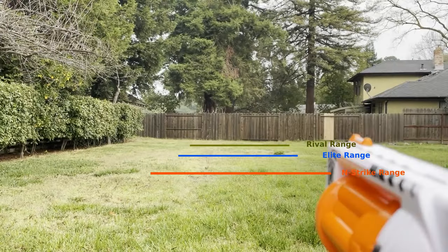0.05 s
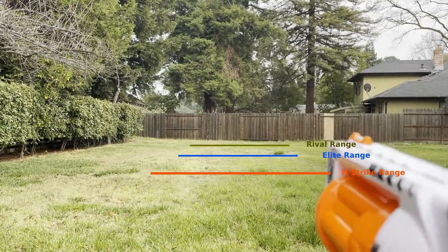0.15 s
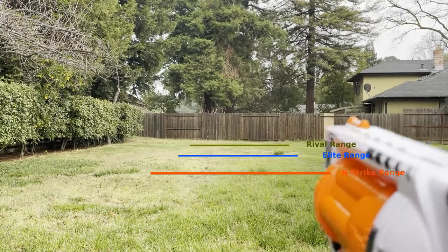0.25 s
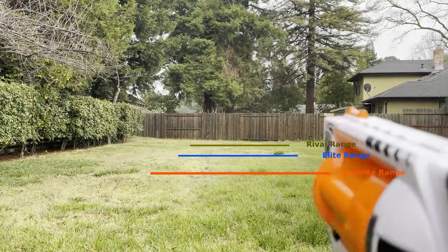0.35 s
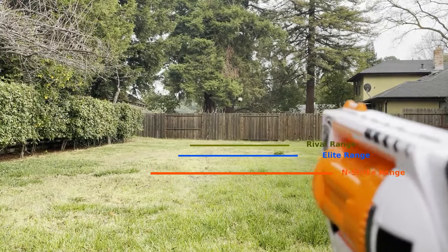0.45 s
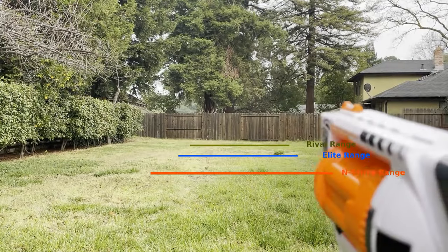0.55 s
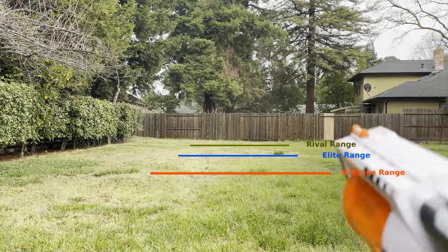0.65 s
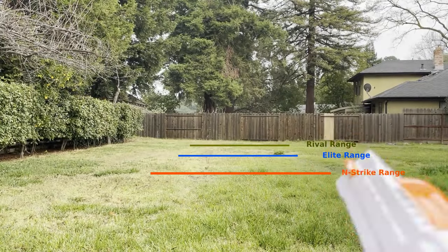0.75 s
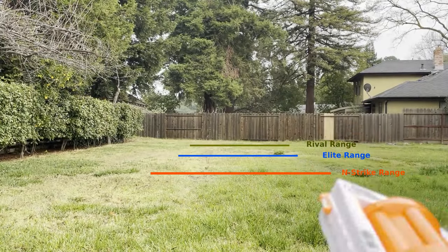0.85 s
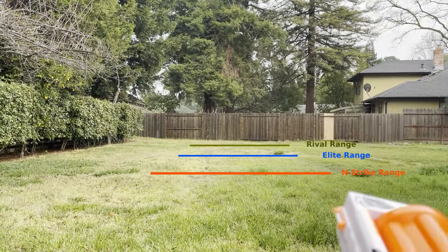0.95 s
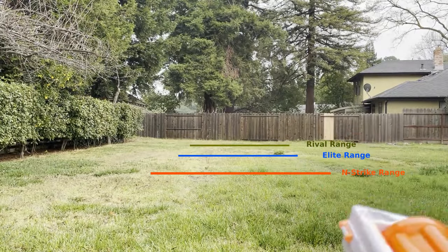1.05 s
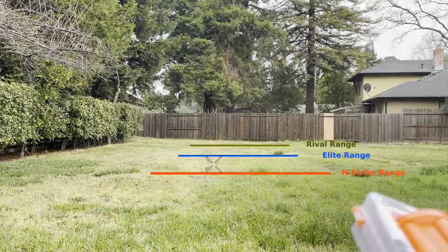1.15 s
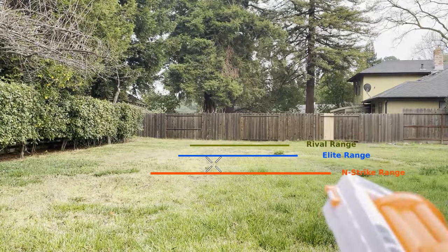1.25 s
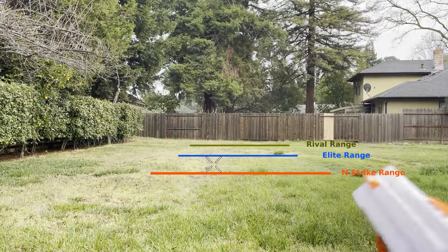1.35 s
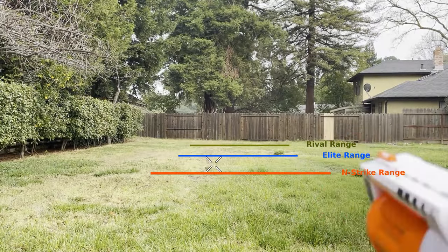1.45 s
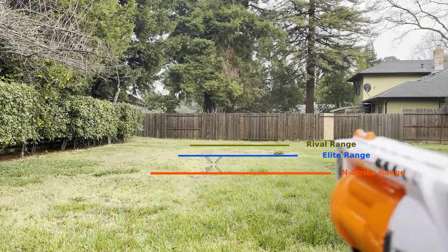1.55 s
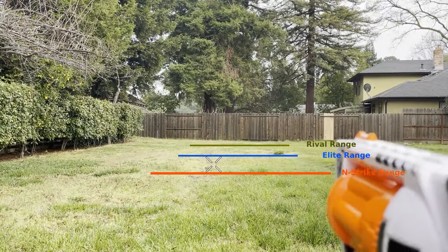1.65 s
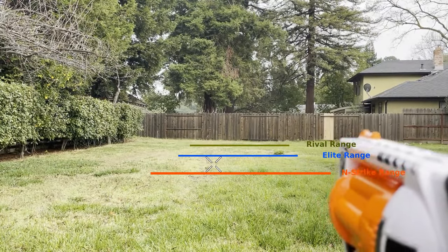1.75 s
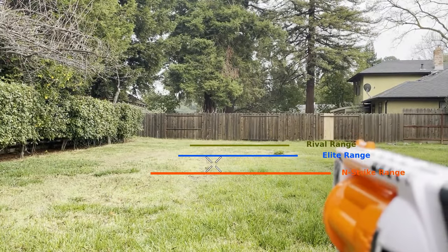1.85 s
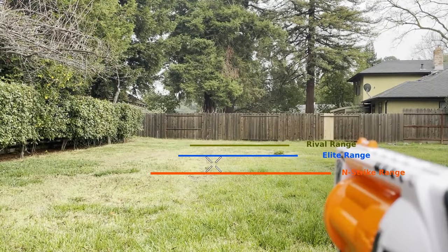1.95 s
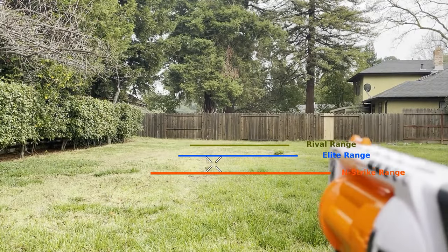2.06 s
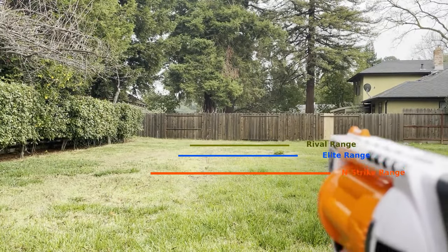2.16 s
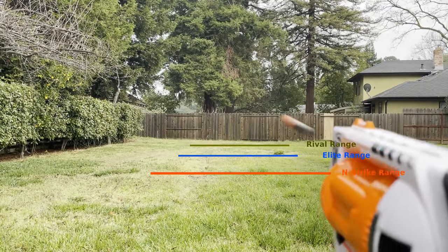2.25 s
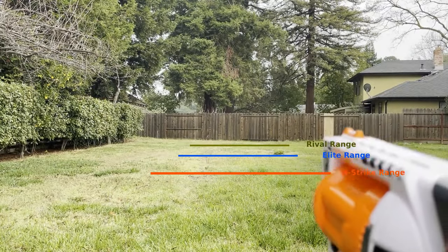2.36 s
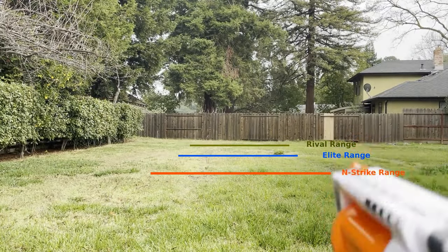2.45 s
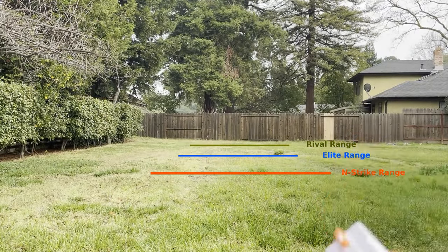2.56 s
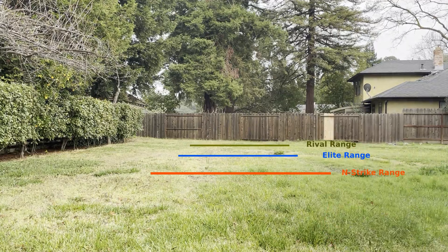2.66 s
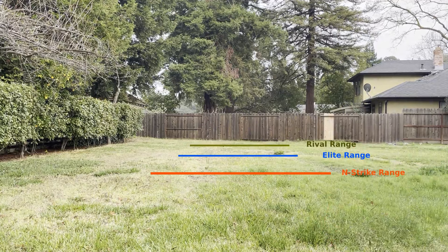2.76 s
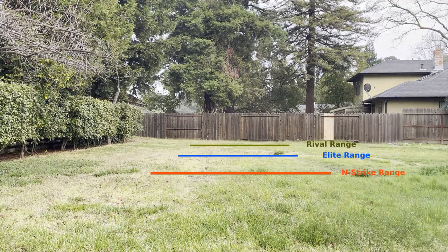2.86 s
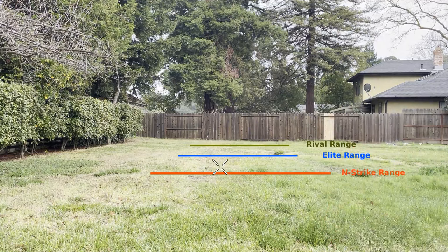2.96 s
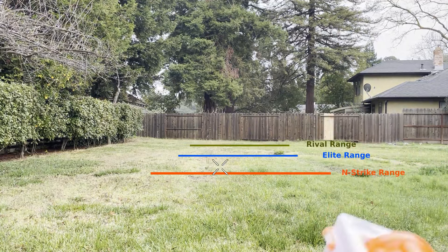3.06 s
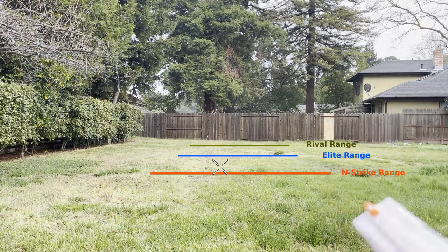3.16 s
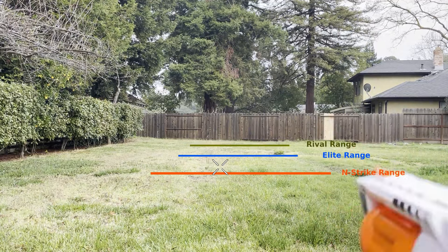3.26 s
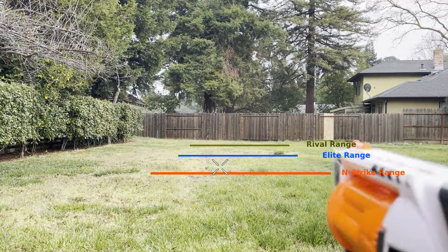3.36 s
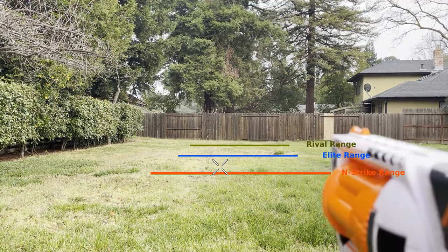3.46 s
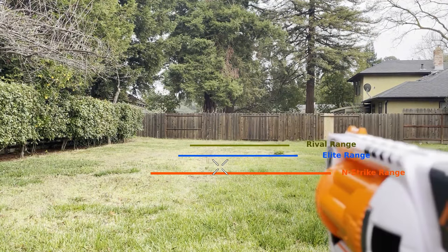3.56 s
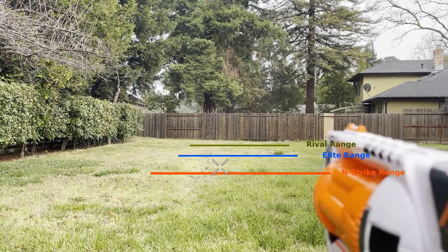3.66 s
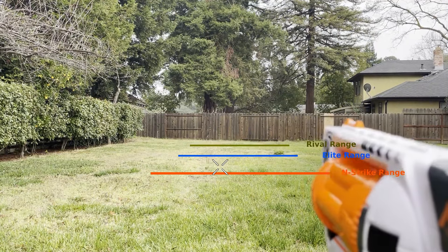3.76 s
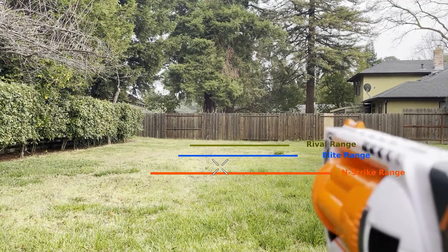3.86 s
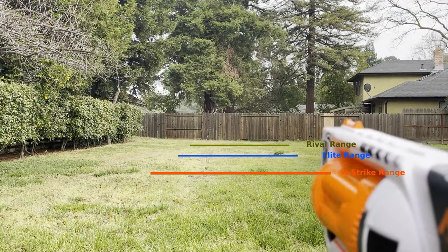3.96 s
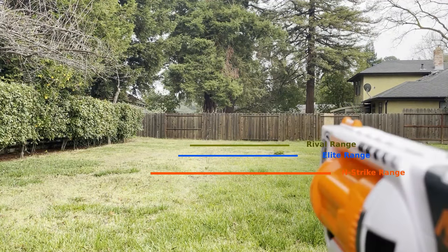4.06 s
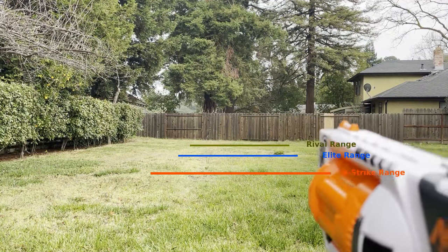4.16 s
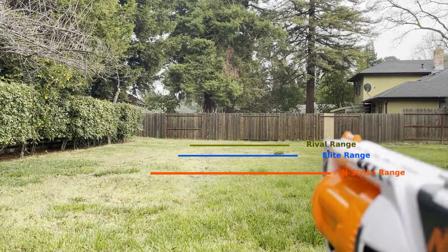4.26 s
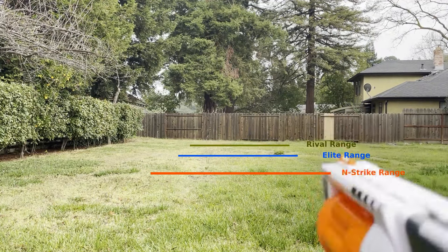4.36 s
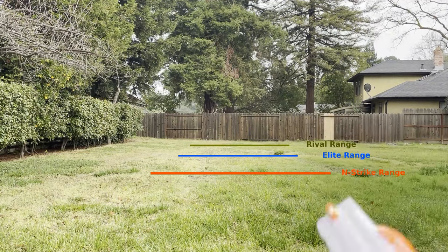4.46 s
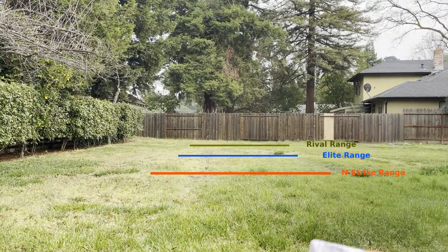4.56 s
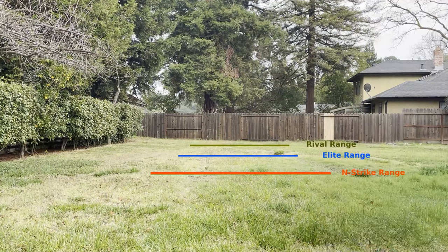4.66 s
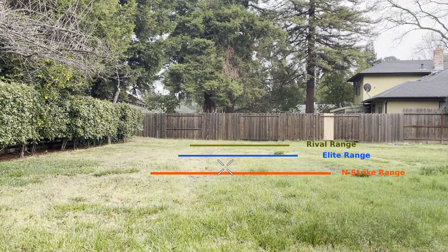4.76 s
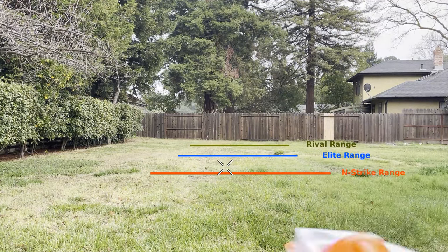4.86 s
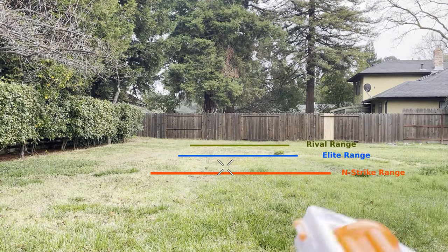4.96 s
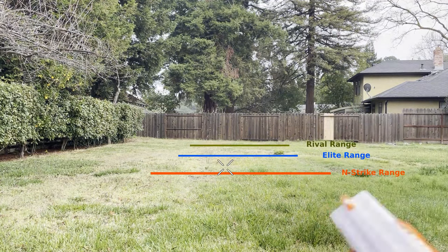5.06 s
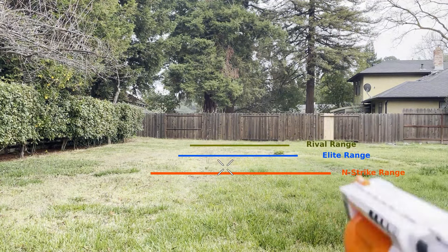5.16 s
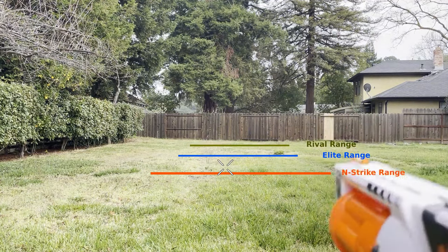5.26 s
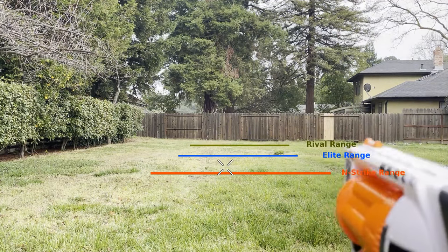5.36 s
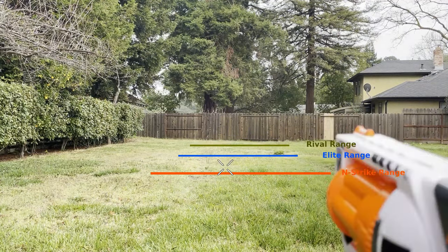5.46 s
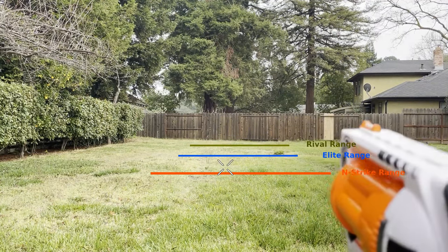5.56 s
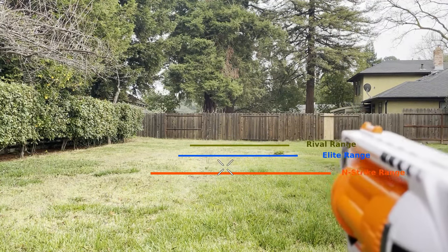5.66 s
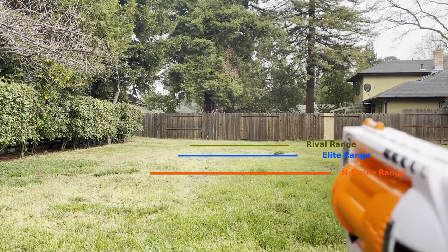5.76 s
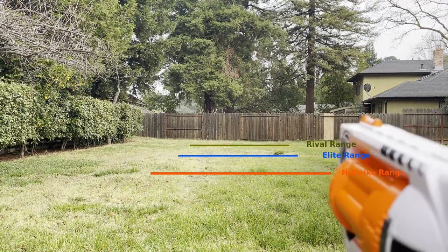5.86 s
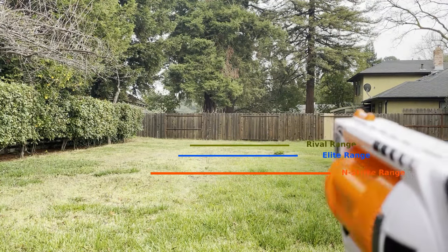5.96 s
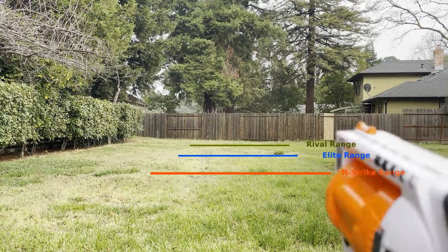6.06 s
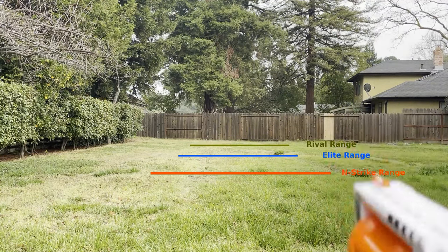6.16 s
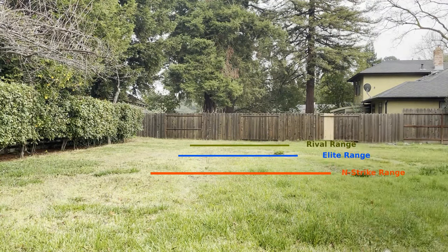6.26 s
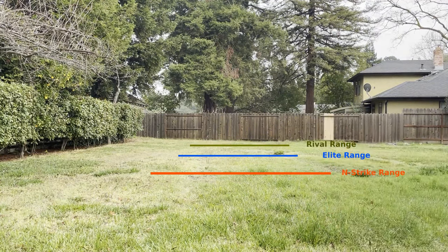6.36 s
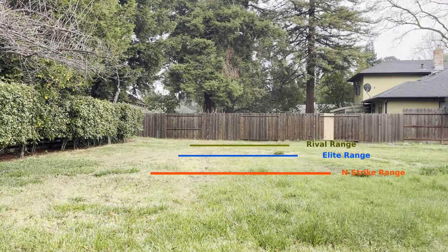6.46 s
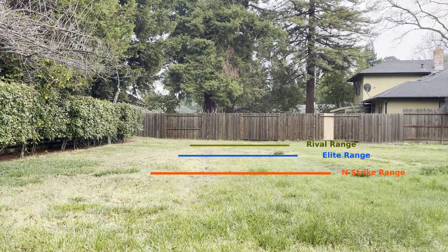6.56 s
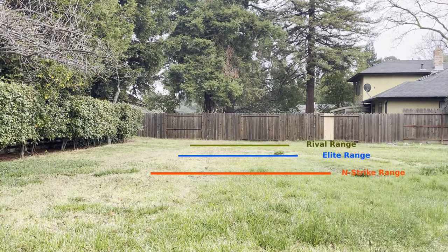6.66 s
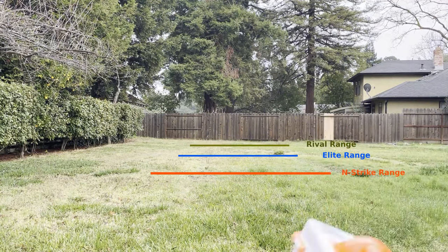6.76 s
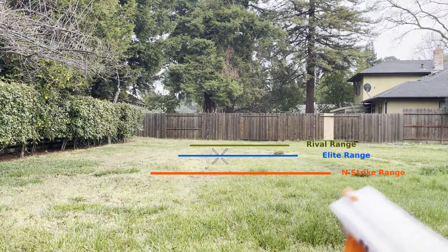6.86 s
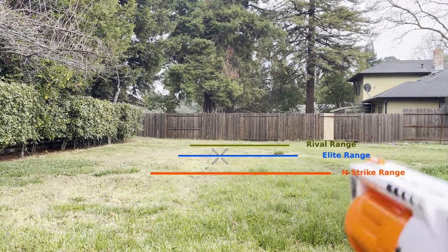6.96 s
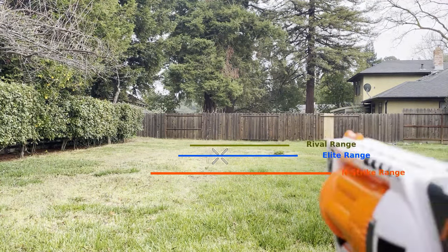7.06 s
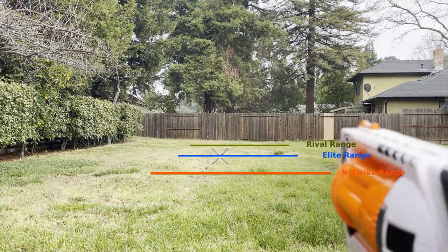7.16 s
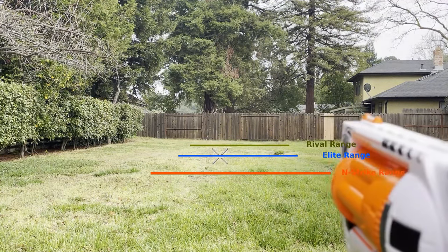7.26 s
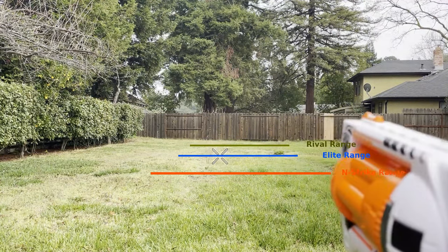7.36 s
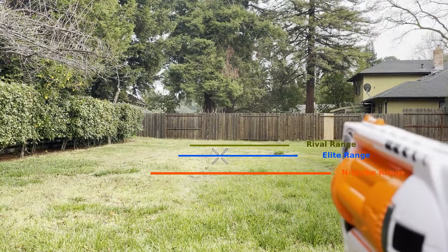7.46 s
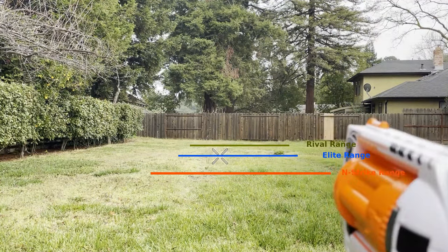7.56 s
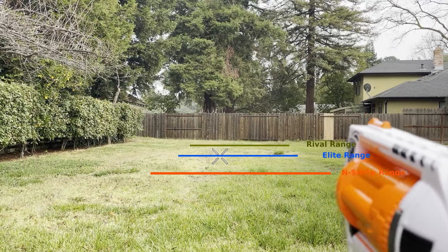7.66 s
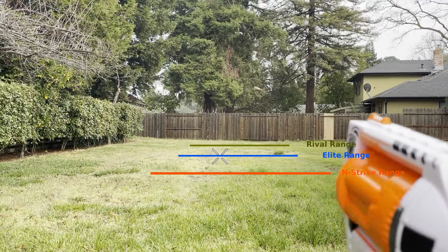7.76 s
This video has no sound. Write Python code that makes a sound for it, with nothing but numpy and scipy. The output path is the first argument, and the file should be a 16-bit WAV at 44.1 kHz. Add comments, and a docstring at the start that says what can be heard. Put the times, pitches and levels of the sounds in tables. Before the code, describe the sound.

At arm's length on a quiet lawn, a spring-powered toy dart blaster fires five times, nearly two seconds apart. Faint plastic knocks and a tiny high trigger squeak precede the first sharp crack with its soft air thump. After each of the first four shots come loose rattles and rubbing, then the slide clacks back and slams forward. Close stereo microphones also catch a very faint low traffic rumble.

```python
"""Faint plastic knocks over a far traffic rumble come first, then a trigger squeak and the first of five shots
of a spring-powered toy dart blaster; between shots its slide is worked, at arm's length on a lawn.
Struck and rubbed plastic excites damped modes of a hollow shell; the plunger adds a thump of air, gliding sines.
The squeak is a throbbing tone, a soft rustle is narrow-band noise, and traffic is noise in half-octave bands.
"""
import sys
import numpy as np
from scipy import signal
from scipy.io import wavfile
from scipy.ndimage import uniform_filter1d

SR = 44100
rng = np.random.default_rng(int(sys.argv[2]) if len(sys.argv) > 2 else 0)


def int16_out(signal):
    """Quantize to a 16-bit WAV file."""
    q = np.round(np.clip(np.atleast_2d(signal).T, -1, 1) * 32767)
    wavfile.write(sys.argv[1], SR, q.astype(np.int16))


N = 344862

# Plunger flights: [t/s, panel level/dB, hollow re panel/dB, bright re panel/dB, thump level/dB, travel/s]
SHOTS = [(0.3888, -9.5, 2, -4.5, -11, .014), (2.2551, -10.5, 0.5, -5, -9, 0.015),
         (4.1238, -9, 0, -7, -9.5, 0.014), (5.9777, -8, -0.5, -6.5, -12.5, 0.0081),
         (7.711, -8, -1.5, -6, -11, 0.013)]
# Damped modes of the shell, three families: [f/Hz, relative level/dB, t60/s]
HOLLOW_MODES = [(410, -22.5, 0.016), (564, 0, 0.024), (845, 4, 0.014), (1081, 5, 0.0072), (1274, 5, 0.007),
                (1870, -16, 0.004)]
PANEL_MODES = [(2150, -10, .01), (2600, -7, .01), (3100, 0, .012), (3450, -2, .009), (3800, 0, .013),
               (4350, -6, .008), (4900, -1, .012), (5600, -3, .011), (6350, -8, .007)]
BRIGHT_MODES = [(7000, 0, .007), (7550, -1, .008), (9000, -1, .006), (9800, -2, .006), (11000, -3, .004),
                (12300, -5, .004), (13700, -6, .005), (15000, -13, .004)]
# Pass-band in which hollow, panel and bright modes radiate, one row each: [low f/Hz, high f/Hz]
RADIATION_BANDS = [(390, 2200), (1900, 7000), (6300, 18000)]
# Hum of the emptied tube and of the frame
CAVITY_HZ, CAVITY_DB, CAVITY_T60_S = 415, -33, 0.21
FRAME_HZ, FRAME_DB, FRAME_T60_S = 296.3, -15.5, 0.02
# Air thump: pitch limits, decay, and its delay, swell and pitch-sag times
THUMP_START_HZ, THUMP_END_HZ, THUMP_T60_S = 121, 56.5, 0.024
THUMP_LATE_S, THUMP_SWELL_S, THUMP_SAG_S, THUMP_SAG_SPAN_S = 0.0074, 0.012, 0.013, 0.00067
# Low knocks: a hand softly bumps the shell, or the emptied tube rings: [t/s, peak level/dB, settled f/Hz,
# t60/s]
BUMPS = [(1.498, -41, 498, 0.12), (4.948, -25.5, 79, 0.031), (6.845, -42, 399, 0.21)]
# Four workings of the slide, each a list of strokes in the order of STROKES: [t/s, panel level/dB]
PRIMES = [
    [(.9423, -19.5), (1.0457, -18.5), (1.0642, -11.5), (1.1446, -29), (1.2282, -14), (1.264, -8),
     (1.3684, -35.5)],
    [(2.7532, -19), (2.82, -15), (2.8308, -10), (2.9128, -35), (2.9902, -14.5), (3.0197, -8.5),
     (3.1507, -35)],
    [(4.6354, -20.5), (4.7057, -15), (4.7167, -13), (4.803, -30), (4.8683, -14.5), (4.8948, -8),
     (5.0604, -37)],
    [(6.4612, -18.5), (6.5186, -16), (6.5277, -10.5), (6.6227, -30), (6.7017, -14.5), (6.7337, -10),
     (6.84, -35.5)],
]
# Strokes: slide breaks free, catch clicks over, slide hits back stop, starts forward, latch snaps,
# slide slams home, hand lets go: [hollow re panel/dB, bright re panel/dB, rattle t60/s,
# favoured hollow f/Hz, favoured panel f/Hz, first contact re rattle/dB]
STROKES = [(-2.5, -11.5, 0.035, 1000, 3060, -0.5), (-4, -1.5, 0.024, 1300, 6400, 6),
           (-2, -3.5, 0.02, 1200, 4400, -10.5), (2.5, -17.5, 0.017, 190, 2500, -4.5),
           (-7, -10.5, 0.0031, 1200, 4550, 11.5), (1, -11.5, 0.022, 480, 3330, 5),
           (-1, -25, 0.026, 490, 2300, 4)]
# Plunger bounces after landing: [first t/s, gap/s, first panel level/dB, loss per bounce/dB]
BOUNCES = [(0.4216, 0.032, -18.5, 14.5), (2.2867, 0.03, -20, 6), (4.1374, 0.031, -17, 12),
           (5.9954, 0.033, -19, 21), (7.7373, 0.014, -20.5, 32)]
# Sound of every bounce: [columns as for STROKES]
BOUNCE_SOUND = (-16, -2.5, 0.0163, 603, 4850, 7.5)
# Other parts knock: [t/s, panel level/dB, hollow re panel/dB, bright re panel/dB, rattle t60/s]
KNOCKS = [(0.1065, -48, 2.5, -39, 0.041), (0.3186, -41.5, -4.5, 0, 0.084),
          (0.3358, -35.5, 2.5, -1.5, 0.075), (0.361, -27, 0, -5.5, 0.013), (0.3748, -22, -8.5, 0.5, 0.039),
          (0.388, -22, 3, -9, 0.012), (0.4724, -29.5, -22, -9, 0.027), (0.4903, -31.5, -25, -18, .015),
          (.514, -32, -26, -6, 0.015), (0.533, -34, -1, 0.5, 0.058), (0.5532, -24.5, -4, -10, .066),
          (.568, -38.5, 5.5, -8, 0.14), (.5905, -31, -6, -12, .03), (0.6143, -26.5, -4, -10, 0.037),
          (.632, -36.5, -1, 2, 0.094), (.7327, -42, 2, -25, 0.097), (0.7634, -28, 6, -16, 0.027),
          (0.7834, -29.5, 6, -9.5, 0.026), (0.8285, -46.5, 12, -31, .031), (.884, -51, 7, -27, .03),
          (0.9246, -42, 12, -47, 0.031), (0.9531, -23.5, -1.5, -3.5, 0.071),
          (0.9637, -17, -14, -4.5, 0.021), (0.994, -29, -2.5, -6, 0.053), (1.1304, -38, -21, -6, .029),
          (1.1862, -34, -8.5, -18.5, 0.041), (1.2133, -26.5, 1, -20.5, 0.0057),
          (1.2546, -30, -6.5, -12.5, 0.021), (1.4152, -36.5, .5, -19, 0.023), (1.484, -46, 7, -28, 0.038),
          (1.496, -43.5, 8.5, -17, 0.039), (1.525, -47, -5, -27, .039), (1.5456, -46, -9, -16, .035),
          (1.5592, -41, -6.5, -8.5, 0.047), (1.5947, -41, -4.5, -16, 0.026), (1.652, -45, 1.5, -11, 0.025),
          (1.6859, -37.5, 0, -12, 0.0065), (1.713, -30.5, -9, -14, 0.017), (1.767, -51, 2.5, -18, 0.03),
          (1.7817, -37.5, -1.5, -12.5, 0.015), (2.096, -26.5, -4, -11, 0.032),
          (2.2062, -36, 3.5, -8, 0.059), (2.2316, -27.5, -2.5, -12, 0.1), (2.381, -32, -25, -4, 0.028),
          (2.4002, -31.5, -9, -5, 0.064), (2.428, -25, -2.5, -12, 0.071), (2.4583, -36.5, -1.5, -4, 0.22),
          (2.488, -28, 2.5, -20, 0.027), (2.5197, -33.5, 1, -11, 0.021), (2.545, -28.5, -4, -18, 0.033),
          (2.589, -37.5, 5.5, -10, 0.048), (2.6014, -38.5, -3, -12, 0.047), (2.6768, -45.5, 8, -18, 0.075),
          (2.724, -38, -18, -15, 0.053), (2.7618, -24.5, -4.5, -10, 0.066), (2.7884, -31, -8.5, -6, .078),
          (2.951, -40, -3, -15, 0.018), (2.9757, -39, -30, -5, 0.028), (3.0697, -36, 2, -17, 0.026),
          (3.3326, -59.5, 6, -16.5, 0.032), (3.3843, -44, -5, -15, .035), (3.458, -48.5, -18, -18, 0.025),
          (3.8774, -46, -37, -24, 0.032), (3.8944, -54, 9.5, -20, 0.036), (3.934, -36.5, -20, -10, 0.017),
          (3.9443, -23.5, -11, -9, 0.017), (3.9979, -30, -1.5, -14, 0.028), (4.2959, -31, 0, -9, 0.043),
          (4.3129, -23, 0.5, -7.5, 0.041), (4.34, -34, 5, -18, 0.016), (4.3639, -32.5, 3, -18, 0.059),
          (4.393, -24, -2.5, -8.5, 0.024), (4.4129, -36, 1, -13, 0.09), (4.4899, -47, 12, -4, 0.1),
          (4.5027, -30, -5, -15.5, 0.025), (4.57, -40, 14.5, -40, 0.023), (4.624, -29.5, -8, -8.5, 0.069),
          (4.6407, -15.5, 0, -8, 0.033), (4.6683, -35, -5.5, 2, 0.03), (4.7883, -35, -2, -9, .016),
          (4.8235, -43.5, -0.5, -16, 0.23), (4.857, -29.5, -42, -7.5, 0.015),
          (4.9374, -31.5, 1.5, -10, 0.054), (5.1937, -54.5, 5, -20.5, 0.032), (5.234, -59, 1.5, -11.5, .03),
          (5.404, -60.5, 12.5, -20.5, 0.028), (5.2942, -59.5, 9, -14.5, .035),
          (5.3552, -48, -13.5, -15, 0.032), (5.8148, -53.5, 1, -32.5, .026), (5.9333, -32, -.5, -7, 0.065),
          (5.9655, -20.5, -27.5, -13, 0.021), (6.156, -37.5, 0.5, -20, 0.042),
          (6.1779, -25.5, -9, -8, 0.043), (6.2376, -33.5, 1.5, -9.5, 0.058), (6.2919, -39, 7.5, -9, 0.053),
          (6.324, -34, 0.5, -18, .019), (6.413, -36.5, -2, -37.5, 0.021), (6.429, -35, -6.5, -14, 0.05),
          (6.4894, -41, -3.5, 6, .1), (6.5962, -38.5, -17, -4, 0.023), (6.6526, -36.5, -17, -21, 0.027),
          (6.7242, -24, 2, -14, 0.032), (6.861, -38, 10, -35, 0.037), (6.9364, -46.5, -16, -14, .035),
          (6.997, -55, 6, -25, 0.021), (7.0558, -40, -9, -14, 0.044), (7.0644, -38.5, -5, -9, 0.044),
          (7.193, -49, 1.5, -15, 0.036), (7.4646, -60.5, 4, -10, .035), (7.5345, -62.5, 16, -31, 0.039),
          (7.6604, -36, 0, -7, 0.045), (7.6998, -22.5, -7, -11, 0.018)]
# Median favoured pitches of those knocks, their scatter, and first contact re rattle
KNOCK_HZ, RING_HZ, PITCH_SCATTER_OCT, KNOCK_SNAP_DB = 537, 3500, 0.32, 3
# Left re right, mean and scatter
CLACK_PAN_DB, PAN_SCATTER_DB = -0.14, 3
# The whole blaster gives a little; level re the hollow knock
BODY_HZ, BODY_DB, BODY_T60_S = 190, -21.5, 0.022
# Rubbing by hands, slide and loose parts:
# [start t/s, end t/s, panel level/dB, hollow level/dB, bright level/dB, grain 0-1]
RUBS = [(0.294, 0.392, -65.5, -55, -68.5, 0.4), (0.452, 0.544, -48, -49.5, -62, .8),
        (0.564, 0.698, -38, -45, -43.5, .75), (0.774, .93, -65, -54.5, -73.5, 0.9),
        (0.954, 1.034, -42.5, -39, -62, 0.8), (1.122, 1.321, -47, -44, -57, 0.7),
        (1.395, 1.754, -69, -61, -82, 1), (2.175, 2.24, -53.5, -50.5, -61.5, .4),
        (2.29, 2.423, -46, -59, -49.5, 1), (2.413, 2.555, -40, -43.5, -61, .6),
        (2.744, 2.976, -51.5, -47.5, -62, 0.7), (2.997, 3.076, -43, -44, -52.5, 0.4),
        (3.2, 3.498, -75.5, -64, -90.5, .9), (3.72, 3.84, -76.5, -75, -73.5, 0.3),
        (3.859, 3.97, -57.5, -60.5, -63, .4), (3.94, 4.012, -62.5, -50.5, -77.5, .5),
        (4.149, 4.245, -41, -56, -52.5, .3), (4.307, 4.436, -42, -44.5, -55, 0.7),
        (4.637, 4.748, -39.5, -39, -52, .5), (4.8, 5.029, -55, -50.5, -63.5, .6),
        (5.1, 5.413, -79.5, -68.5, -87, 0.6), (5.913, 5.98, -53, -55.5, -56.5, 0),
        (6.062, 6.137, -38, -67, -48, .05), (6.169, 6.237, -45.5, -45, -68, 0.1),
        (6.456, 6.544, -39.5, -38.5, -56, .5), (6.628, 6.82, -49.5, -47.5, -59, .6),
        (6.87, 7.047, -70.5, -60.5, -84.5, 1), (7.62, 7.7, -57.5, -57, -59.5, 0.5),
        (7.7, 7.75, -41, -53, -62, 0)]
RUB_RISE_DB_S, RUB_FALL_DB_S = 497, 303
# Trigger squeaks: [t/s, length/s, f/Hz at mid-length throb crest, level/dB there, throb depth/dB]
SQUEAKS = [(0.338, .027, 11550, -11.5, 18), (3.915, 0.017, 11550, -24, 4)]
# Throb rate, fall at both ends, growth from start to end, fractional climb in pitch from start to end
THROB_HZ, SQUEAK_EDGE_DB, SQUEAK_GROWTH_DB, SQUEAK_CLIMB = 125, 19, 8, 0.02
# Faint rustle while the blaster is raised, one list for each swell: [t/s, level/dB]
RUSTLE = [
    [(3.2, -79), (3.508, -78), (3.724, -78.5), (3.884, -58), (3.93, -64)],
    [(5.1, -70.5), (5.32, -77), (5.44, -76), (5.6, -75), (5.858, -78.5), (5.92, -79)],
]
# Bands of the rustle: [f/Hz, width/Hz, relative level/dB]
RUSTLE_BANDS = [(2840, 400, -4), (3460, 170, 2), (4570, 1800, -9.5)]
# Traffic spectrum: [f/Hz, relative level per Hz/dB]
TRAFFIC_SPECTRUM = [(15, -45), (25, -19.5), (49, -8), (101, 2), (142, -20.5), (186, -24.5), (363, -35.5),
                    (427, -26.5), (543, -14), (655, -30.5), (1860, -39.5), (2240, -50), (3440, -54.5),
                    (15000, -62.5)]
TRAFFIC_DB = -49.5
# Shading of the right microphone: [f/Hz, width/Hz, share of amplitude taken away]
SHADE = [(560, 4500, 0.55), (1250, 890, 0.75), (4300, 1800, 0.067)]
# Narrow loss at the microphones: [f/Hz, width/Hz, share of amplitude taken away]
MIC_NOTCH = (6900, 230, .8)
LOW_CUT_HZ, TOP_HZ = 9.7, 16000


def shots():
    """Spring release: forced shaking while the plunger travels, then free decay; frame and emptied tube hum."""
    out = np.zeros((2, N))
    t = np.arange(8192) / SR
    for s, panel_db, hollow_db, bright_db, _, travel in SHOTS:
        after = np.maximum(t - travel, 0)
        onset = 1 - np.exp(-t / 0.00063)
        release = 1.2 * undb(-60 * t / 0.02)
        landing = undb(-60 * after / 0.028)
        shiver = undb(-10.5 - 60 * after / 0.18)
        add(out, shell(onset * (release + landing + shiver), panel_db, hollow_db, bright_db), s)
        add(out, thud(CAVITY_HZ, CAVITY_DB, CAVITY_T60_S, glide=0.05), s + travel)
        add(out, thud(FRAME_HZ, FRAME_DB, FRAME_T60_S, glide=0.063), s + 0.0018)
    return out


def thumps():
    """Air displacement: squeezed air swells from the barrel, then sags in pitch; a hand bumps the shell and the
    emptied tube rings."""
    out = np.zeros((2, N))
    t = np.arange(4096) / SR
    sag = 1 / (1 + np.exp((t - THUMP_SAG_S) / THUMP_SAG_SPAN_S))
    hz = THUMP_END_HZ + (THUMP_START_HZ - THUMP_END_HZ) * sag
    rise = np.sin(np.pi / 2 * np.minimum(t / THUMP_SWELL_S, 1))
    decay = undb(-60 * np.maximum(t - THUMP_SWELL_S, 0) / THUMP_T60_S)
    thump = rise * decay * np.sin(2 * np.pi * np.cumsum(hz) / SR)
    for s, *_, thump_db, _ in SHOTS:
        add(out, undb(thump_db) * thump, s + THUMP_LATE_S, pan_db=2.5)
    for s, db, hz, t60 in BUMPS:
        add(out, thud(hz, db, t60, glide=0.13), s)
    return out


def thud(hz, db, t60, glide):
    """Damped low oscillation: a push of air that sinks in pitch as it dies."""
    t = np.arange(8192) / SR
    turns = np.cumsum(hz * (1 + glide * np.exp(-t / 0.0088))) / SR
    envelope = undb(-60 * t / t60) * (1 - np.exp(-t / 0.0012))
    sound = -np.sin(2 * np.pi * turns) * envelope
    return undb(db) * sound / np.abs(sound).max()


def clacks():
    """Impact excitation: slide strokes, plunger bounces and loose knocks, each from a slightly different side."""
    out = np.zeros((2, N))
    t = np.arange(5000) / SR
    rows = []
    for prime in PRIMES:
        rows += [(s, db, *sound) for (s, db), sound in zip(prime, STROKES)]
    for s, gap, db, loss_db in BOUNCES:
        rows += [(s + k * gap, db - k * loss_db, *BOUNCE_SOUND) for k in range(3)]
    for knock in KNOCKS:
        low, high = 2 ** (PITCH_SCATTER_OCT * rng.standard_normal(2))
        rows.append((*knock, KNOCK_HZ * low, RING_HZ * high, KNOCK_SNAP_DB))
    for s, *sound in rows:
        pan_db = CLACK_PAN_DB + PAN_SCATTER_DB * rng.standard_normal()
        add(out, clack(t, *sound), s, pan_db)
    return out


def clack(t, panel_db, hollow_db, bright_db, t60, hollow_hz, panel_hz, snap_db):
    """Repeated contact: a sharp first touch, a slower rattle and a faint shiver; long rattles start softer."""
    fall_db = -60 * t / t60
    rise = 1 - np.exp(-(t / (0.04 * t60)) ** 2)
    rattle = undb(fall_db)
    snap = undb(snap_db + 8.6 * fall_db)
    shiver = undb(-18 + 0.22 * fall_db)
    push = rise * (rattle + snap + shiver)
    body = thud(BODY_HZ, panel_db + hollow_db + BODY_DB, BODY_T60_S, glide=0.3)[:len(t)]
    return shell(push, panel_db, hollow_db, bright_db, hollow_hz, panel_hz) + body


def shell(shape, panel_db, hollow_db, bright_db, hollow_hz=None, panel_hz=None):
    """Modal superposition: the shell answers a rattling push; each microphone hears its own mix of it."""
    chance = rng.standard_normal((6, len(shape) + 20))
    # three families for the shared sound, then three for the difference of the sides
    modes = (HOLLOW_MODES, PANEL_MODES, BRIGHT_MODES) * 2
    favoured_hz = (hollow_hz, panel_hz, None) * 2
    families = [ring(c[20:] * shape, m, c, near_hz) for c, m, near_hz in zip(chance, modes, favoured_hz)]
    # short waves reach one microphone a part of a cycle early, which one depends on the spot
    quadrature = np.imag(signal.hilbert(families[2]))
    families[5] = 0.5 * families[5] + 0.9 * np.sign(chance[5, 19]) * quadrature
    hollow, panels, bright = (radiate(pair(families[k], families[k + 3], wide), RADIATION_BANDS[k])
                              for k, wide in enumerate((0.25, 0.15, 0.55)))
    return undb(panel_db) * (panels + undb(hollow_db) * hollow + undb(bright_db) * bright)


def ring(push, modes, lot, near_hz=None, scatter_db=2.5, detune=0.025):
    """Modal response to a push at a new spot each time; its loudest 4 ms have rms 1."""
    hz, db, t60 = np.transpose(modes)[:, :, None]
    t = np.arange(2048) / SR
    pitch_lot, level_lot = lot[:2 * len(modes)].reshape(2, -1, 1)
    if near_hz:
        # the part that is hit favours the modes near its own pitch
        db = db - np.minimum(24.0 * np.abs(np.log2(hz / near_hz)), 12.0)
    hz = hz * (1 + detune * pitch_lot)
    partials = undb(db + scatter_db * level_lot) * undb(-60 * t / t60) * np.sin(2 * np.pi * hz * t)
    sound = signal.fftconvolve(push, partials.sum(axis=0))[:len(push)]
    return sound / np.sqrt(uniform_filter1d(sound ** 2, size=176).max())


def radiate(x, edges_hz):
    """Radiation efficiency: outside its own range a family of modes cancels itself."""
    return signal.sosfilt(signal.butter(3, edges_hz, "band", fs=SR, output="sos"), x)


def rub():
    """Stick-slip friction of plastic on plastic: hiss and dense uneven ticks in the shell's modes."""
    panel_level, hollow_level, bright_level, catching = gestures()
    # on average 160 slips a second, of uneven strength
    slips = (rng.random(N) < 160 / SR) * undb(2.6 * rng.exponential(size=N))
    ticks = signal.lfilter([1], [1, -np.exp(-1 / (0.0012 * SR))], slips)
    grip = unit(undb(2.2 * walk(31)) * (1 + 1.6 * ticks)) ** catching
    hollow_band, panel_band, bright_band = RADIATION_BANDS
    out = np.zeros((2, N))
    for modes, edges_hz, level, wide in ((PANEL_MODES, panel_band, panel_level, 0.2),
                                         (HOLLOW_MODES, hollow_band, hollow_level, 0.25),
                                         (BRIGHT_MODES, bright_band, bright_level, 0.5)):
        grains = rng.standard_normal((2, N)) * grip
        # a mode's bandwidth is 2.2 / t60
        rung = sum(undb(db) * band(grains, hz, 2.2 / t60) for hz, db, t60 in modes)
        mid, side = unit(radiate(rung, edges_hz))
        out += level * pair(mid, side, wide)
    return out


def gestures():
    """Envelopes of friction: panel, hollow and bright levels swell, hold and die; grain sets the catching."""
    t = np.arange(0, N, 64) / SR
    levels, catching, weight = 0, 0, 1e-30
    for start, end, *dbs, grain in RUBS:
        rise_db = -RUB_RISE_DB_S * np.maximum(start - t, 0)
        fall_db = -RUB_FALL_DB_S * np.maximum(t - end, 0)
        reach = undb(rise_db + fall_db)
        levels = levels + undb(dbs)[:, None] * reach
        # overlapping gestures share their grain by panel level
        catching = catching + grain * undb(dbs[0]) * reach
        weight = weight + undb(dbs[0]) * reach
    return [np.interp(np.arange(N) / SR, t, row) for row in (*levels, catching / weight)]


def squeaks():
    """Friction-driven oscillation: the trigger's sliding contact sings one high, throbbing tone."""
    out = np.zeros((2, N))
    for s, length, hz, db, throb_db in SQUEAKS:
        t = np.arange(0, length, 1 / SR)
        progress = t / length - 0.5
        throb = np.abs(np.cos(np.pi * THROB_HZ * (t - length / 2))) - 1
        edge_db = SQUEAK_EDGE_DB * (2 * progress) ** 4
        level_db = db - edge_db + throb_db * throb + SQUEAK_GROWTH_DB * progress
        pitch = hz * (1 + 0.015 * throb + SQUEAK_CLIMB * progress)
        tone = np.sin(2 * np.pi * np.cumsum(pitch) / SR)
        add(out, undb(level_db) * tone, s, pan_db=-0.5)
    return out


def rustle():
    """Band-limited noise: a soft hiss in a few close bands that swells and fades."""
    hiss = sum(undb(db) * band(band(rng.standard_normal((2, N)), hz, width_hz), hz, width_hz)
               for hz, width_hz, db in RUSTLE_BANDS)
    mid, side = unit(hiss)
    t = np.arange(N) / SR
    level = sum(undb(np.interp(t, *np.transpose(table), left=-120, right=-120)) for table in RUSTLE)
    return level * undb(2.5 * walk(9)) * pair(mid, side, 0.35)


def traffic():
    """Diffuse noise: half-octave bands swell together and flicker alone; the bass is most alike left and right."""
    out = np.zeros((2, N))
    swell = walk(0.28)
    table_hz, table_db = np.transpose(TRAFFIC_SPECTRUM)
    for hz in 28 * 2 ** np.arange(0, 9.1, 0.5):
        mid, side = band(band(rng.standard_normal((2, N)), hz, hz / 2), hz, hz / 2)
        spectrum_db = np.interp(np.log(hz), np.log(table_hz), table_db)
        db = spectrum_db + 0.37 * swell + 1.3 * walk(7.5)
        out += undb(db) * pair(mid, side, np.clip(hz / 620.0, 0.15, 0.9))
    return unit(out) * undb(TRAFFIC_DB)


def undb(db):
    """Amplitude ratio of a level in dB."""
    return 10 ** (np.asarray(db) / 20)


def unit(x):
    """Normalization to rms 1."""
    return x / np.sqrt(np.mean(x ** 2))


def band(x, hz, width_hz):
    """Simple resonance: two-pole band-pass, gain 1 at the centre."""
    return signal.lfilter(*signal.iirpeak(hz, hz / width_hz, fs=SR), x)


def walk(rate):
    """Slow random fluctuation: values held 1 / rate seconds and smoothed twice; spread near 1."""
    k = int(SR / rate)
    held = np.repeat(rng.standard_normal(N // k + 1), k)
    return 1.3 * uniform_filter1d(uniform_filter1d(held, k), k)[:N]


def pair(mid, side, wide):
    """Partial coherence: left and right share one sound and differ by another."""
    return mid + wide * side * np.array([[1], [-1]])


def add(out, sound, s, pan_db=0.0):
    """Superposition of a sound at a time, with left pan_db above right."""
    i = int(s * SR)
    sound = np.atleast_2d(sound)[:, :N - i]
    out[:, i:i + sound.shape[1]] += sound * undb([[pan_db / 2], [-pan_db / 2]])


def scene():
    """Superposition of the blaster, partly shaded from the right microphone, and the traffic."""
    left, right = shots() + clacks() + rub()
    for hz, width_hz, share in SHADE:
        right = right - share * band(right, hz, width_hz)
    blaster = np.array([left, undb(1.0) * right])
    return blaster + thumps() + squeaks() + rustle() + traffic()


def record(dry):
    """Transduction: microphones lose deep bass and a sliver of treble; the recorder rounds peaks, cuts the top."""
    heard = signal.sosfilt(signal.butter(2, LOW_CUT_HZ, "high", fs=SR, output="sos"), dry)
    hz, width_hz, share = MIC_NOTCH
    heard = heard - share * band(heard, hz, width_hz)
    rounded = np.tanh(0.84 * heard) / 1.04
    return signal.sosfilt(signal.ellip(10, 0.2, 90, TOP_HZ, fs=SR, output="sos"), rounded)


dry = scene()
out = record(dry)
int16_out(out)
```